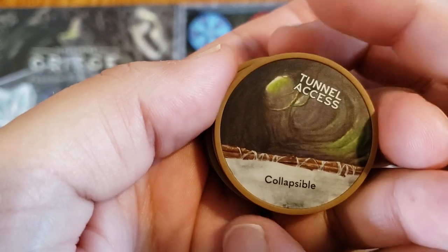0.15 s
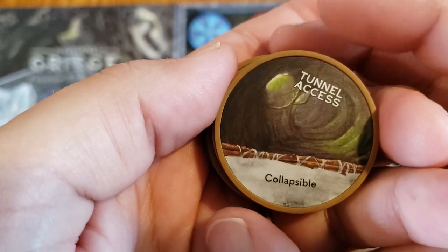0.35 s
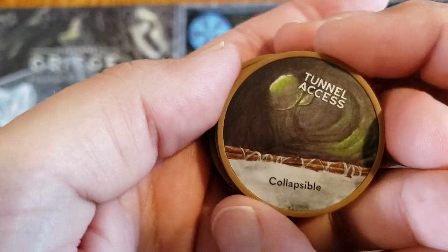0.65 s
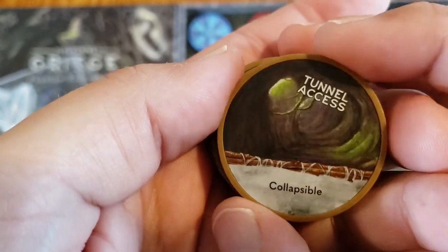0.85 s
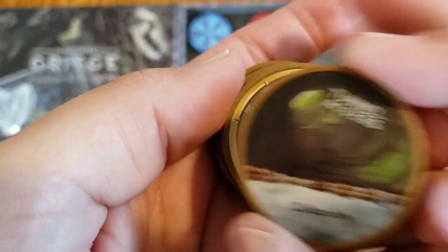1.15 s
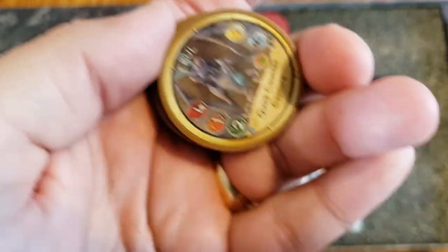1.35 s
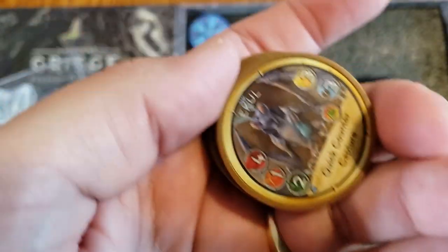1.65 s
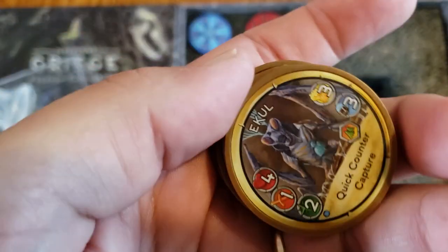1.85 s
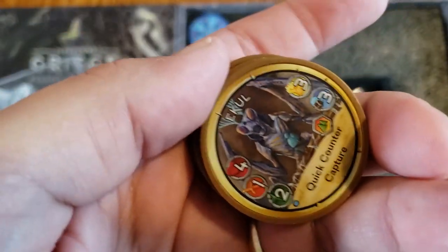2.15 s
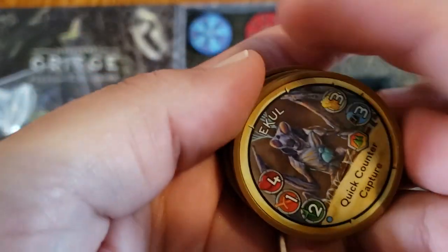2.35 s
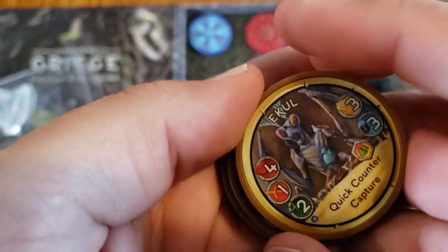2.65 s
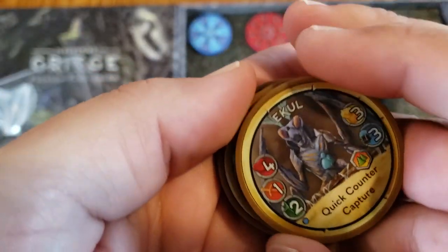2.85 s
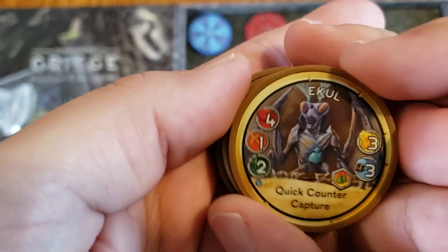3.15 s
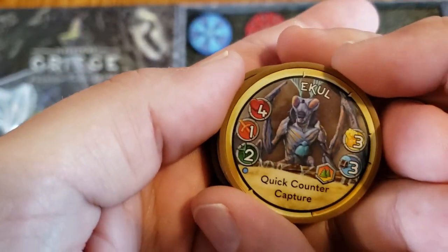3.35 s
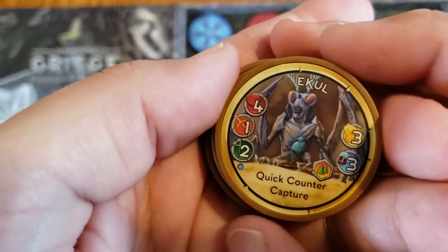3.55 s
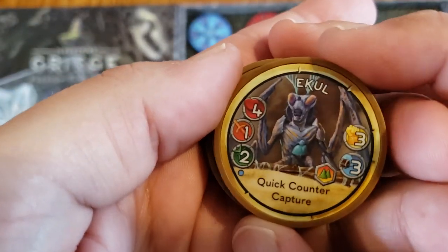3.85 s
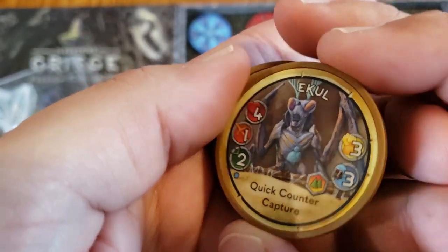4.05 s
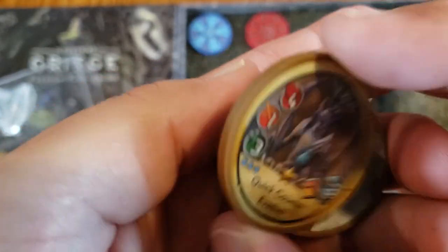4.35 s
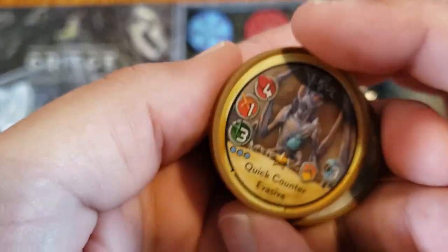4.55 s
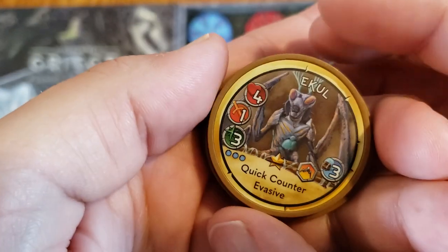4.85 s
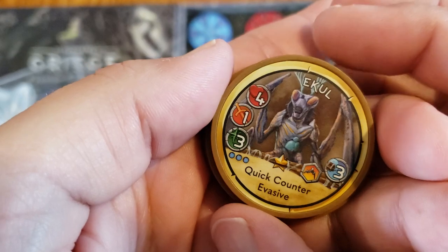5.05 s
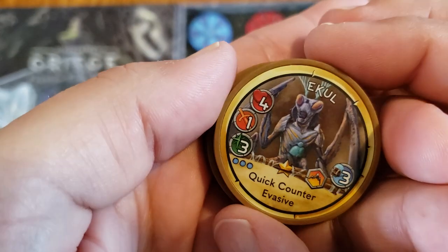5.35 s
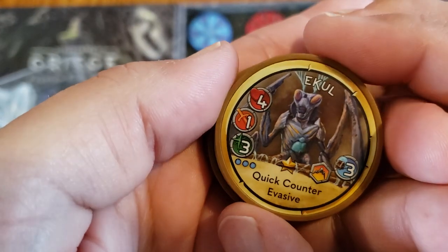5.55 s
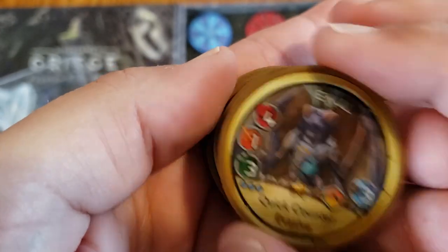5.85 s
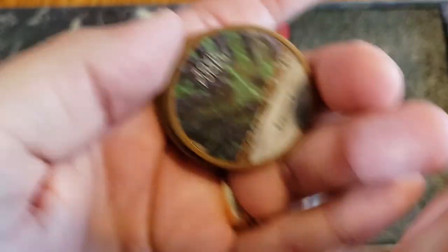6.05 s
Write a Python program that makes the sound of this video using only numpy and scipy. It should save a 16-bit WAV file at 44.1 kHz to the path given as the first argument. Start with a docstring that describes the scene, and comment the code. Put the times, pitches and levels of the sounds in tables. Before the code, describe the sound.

A quiet small room, with low wandering rumble, very faint hum and hiss, captured close by a phone in stereo. Nothing else until about 1.3 s, when dry skin brushes softly over a plastic rim. At 1.86 s a tossed chip skids and clatters on the table, the hardest hits near 1.91 s, woody thuds mixed with bright plastic clinks, bouncing rapidly until 2.14 s and fluttering away over half a second. From 2.4 to 3.1 s come faint skin rustle and small gritty slides of the stack, leaning left. Another brush at 3.35 s, a light click at 3.52 s with a soft rub, a tiny slip at 3.9 s. Faint scraping at 4.3-4.45 s, a crisp click at 4.6 s, then a loud, dense volley of sharp clacks at 4.80-4.84 s with a brief room tail. Quiet returns; one faint tick at 5.74 s.

```python
"""First a small quiet room is heard: wandering rumble, faint hum and hiss, from filtered noise and sines.
Close to the phone's microphone, skin brushes plastic game chips: swelling and fading treble noise.
One chip is tossed aside and clatters to rest on the table: decaying noise drives table and chip spectra.
The stack slides and clicks in the hand, and a flipped chip clacks home: gritty strokes through the stack's
spectrum and snaps through tuned resonances, nearer the left port and answered by the walls."""
import sys
import numpy as np
from scipy import signal
from scipy.fft import rfft, irfft, next_fast_len
from scipy.io import wavfile
from scipy.ndimage import map_coordinates

SR = 44100
rng = np.random.default_rng(int(sys.argv[2]) if len(sys.argv) > 2 else 0)


def master_out(mix):
    """Clip the mix to full scale and print it as 16-bit PCM to the path in sys.argv[1]."""
    frames = np.transpose(np.atleast_2d(mix))
    ceiling = np.clip(frames, -1, 1)
    pcm = np.round(ceiling * 32767).astype(np.int16)
    wavfile.write(sys.argv[1], SR, pcm)


N = 273420  # samples, 6.2 s


def amp(db):
    """Decibels to gain."""
    return 10 ** (np.asarray(db) / 20)


def unit(x):
    """Scaled to rms 1."""
    return x / np.sqrt(np.mean(x ** 2) + 1e-20)


def along(points, hz):
    """(f/Hz, value) points read on a log frequency axis."""
    f, v = np.transpose(points)
    return np.interp(np.log(hz + 1), np.log(f + 1), v)


def filtered(x, response):
    """x times a response of frequency."""
    n = x.shape[-1]
    padded = next_fast_len(n + 8192)
    spectrum = rfft(x, padded) * response(np.fft.rfftfreq(padded, 1 / SR))
    return irfft(spectrum, padded)[..., :n]


def body(x, spectrum, size=4096):
    """x through a causal (minimum-phase) body with this spectrum and unit energy."""
    cepstrum = irfft(np.log(amp(along(spectrum, np.fft.rfftfreq(size, 1 / SR)))))
    # folding the cepstrum forward in time makes the response causal
    cepstrum[1:size // 2] *= 2
    cepstrum[size // 2 + 1:] = 0
    kick = irfft(np.exp(rfft(cepstrum)))
    kick = kick / np.linalg.norm(kick)
    return signal.fftconvolve(x, kick[None], axes=1)[:, :x.shape[1]]


def ports(pair, alike):
    """Two unrelated signals mixed to a given left-right likeness at each frequency."""
    def turn(hz):
        return np.arccos(np.clip(along(alike, hz), -1, 1)) / 2
    mid, side = filtered(pair, lambda hz: np.array([np.cos(turn(hz)), np.sin(turn(hz))]))
    return np.array([mid + side, mid - side])


def pan(db):
    """Left and right gains, left louder by db, of mean power 1."""
    return unit(amp([[db / 2], [-db / 2]]))


def add(track, s, sound):
    """Mix a sound in at time s."""
    part = track[:, round(s * SR):][:, :sound.shape[1]]
    part += sound[:, :part.shape[1]]


def grit(n, rate, spread_db):
    """Stereo force of many tiny contacts whose size changes rate times a second."""
    knots = rng.standard_normal(n)
    size_db = spread_db * np.interp(np.arange(n) * rate / SR, np.arange(n), knots)
    return unit(rng.standard_normal((2, n)) * amp(size_db))


def band(x, hz, width):
    """x through the same resonance twice for steep sides, scaled to energy 1 per channel."""
    hz = np.clip(hz, 50, SR / 2.2)
    b, a = signal.iirpeak(hz, hz / abs(width), SR)
    y = signal.lfilter(b, a, signal.lfilter(b, a, x))
    return y / np.sqrt(np.sum(y ** 2) / len(y))


def ringing(force, modes):
    """A force sets a group of (f/Hz, width/Hz, level/dB) resonances ringing; energy 1 per channel in all."""
    y = sum(amp(db) * band(force, hz, width) for hz, width, db in modes)
    return y / np.sqrt(np.sum(y ** 2) / len(y))


def wobble(rate):
    """A smooth random curve, rate knots a second."""
    return map_coordinates(rng.standard_normal(256), [np.arange(N) * rate / SR], mode="wrap")


# spectrum of the room air: f/Hz, level per Hz/dB
AIR_SPECTRUM = [(15, -49.5), (25, -18.5), (81, 0), (125, -5), (191, -21.5), (224, -16.5), (250, -25.5),
                (309, -24.5), (462, -30), (515, -28.5), (790, -34), (6540, -42.5), (7280, -46.5),
                (13500, -34), (15000, -44)]
# how alike the air is at the two ports: f/Hz, left-right likeness (1 same, -1 opposite)
AIR_LIKENESS = [(60, 0.88), (180, 0.92), (550, 0.16), (1650, -0.069), (4970, -0.02), (15000, -0.52)]
# a low hum that swells once and fades: peak t/s, half length to 1/e/s, f/Hz, peak level/dB
SWELLING_HUM = (4.75, .65, 173, -74)
AIR_DB, RUMBLE_DB = -64, -66.5  # gains of the air's upper part and of its rumble
SWELL_DB, SWELLS_PER_S = 1.5, 5.3  # typical wander of the rumble, and its random knots a second


def background(hum_hz=222, hum_db=-78, hiss_db=-86):
    """Room rumble that wanders at random, air noise, a steady and a swelling hum, and microphone hiss."""
    t = np.arange(N) / SR
    air = unit(body(ports(rng.standard_normal((2, N)), AIR_LIKENESS), AIR_SPECTRUM))
    low = filtered(air, lambda hz: 1 / (1 + (hz / 170) ** 4))
    rumble = low * amp(RUMBLE_DB + SWELL_DB * wobble(SWELLS_PER_S))
    peak_s, half_s, low_hz, low_db = SWELLING_HUM
    swell = np.exp(-((t - peak_s) / half_s) ** 2)
    hums = amp(hum_db) * np.sin(2 * np.pi * hum_hz * t)
    hums += amp(low_db) * swell * np.sin(2 * np.pi * low_hz * t)
    # f/Hz, level per Hz/dB
    hiss_spectrum = [(6000, -23.5), (7400, 5.0), (8500, -24.5), (11500, -2.5), (14500, -12)]
    hiss = body(rng.standard_normal((2, N)), hiss_spectrum)
    # sqrt(2) makes the hum levels rms
    return amp(AIR_DB) * (air - low) + rumble + np.sqrt(2) * hums + amp(hiss_db) * hiss


# skin brushing a rim: t/s, rise/s, t60/s, level/dB, left over right/dB
RIM_BRUSHES = [(1.27, 0.013, 0.39, -58.5, -3), (2.425, 0.023, 0.49, -65, 0), (3.343, 0.014, 0.22, -56.5, 0),
               (3.57, 0.055, 0.38, -61.5, 5)]
# spectrum of dry skin on plastic: f/Hz, level per Hz/dB
SKIN_SPECTRUM = [(1500, -9.5), (5000, -18.5), (7200, -5), (8600, -10), (10000, -1), (12500, 3), (14500, 0),
                 (15500, 7)]


def brushes():
    """Dry skin hisses over a rim: many tiny contacts rise, then die away."""
    out, t = np.zeros((2, N)), np.arange(SR // 2) / SR
    for s, rise, t60, db, side_db in RIM_BRUSHES:
        stroke = np.minimum(t / rise, 1) * amp(db - 60 * np.maximum(t - rise, 0) / t60)
        add(out, s, stroke * grit(len(t), rate=710, spread_db=2.0) * pan(side_db))
    return body(out, SKIN_SPECTRUM)


# the tossed chip's bounces: t/s, table thud level/dB, chip clink level/dB, t60/s
CHIP_BOUNCES = [(1.863, -25.5, -24.5, .04), (1.886, -31, -28, .04), (1.9094, -20.5, -16, 0.03),
                (1.916, -18, -12, .028), (1.938, -25, -41, .03), (1.950, -28, -21.5, .05),
                (2.013, -36, -40, .025), (2.036, -29, -32, .04), (2.0674, -28.5, -24, 0.077),
                (2.087, -35.5, -26, .05), (2.115, -32.5, -43, .03), (2.136, -37, -33, .03)]
# spectrum of the table top: f/Hz, level per Hz/dB
TABLE_SPECTRUM = [(20, -48.5), (45, -21.5), (65, -8), (100, -11.5), (135, 3), (190, -5), (310, 0.5),
                  (520, -3.5), (720, 0), (980, -7), (1230, -2.5), (1500, -6.5), (2300, -6), (3200, -13),
                  (3900, -16.5), (7000, -30)]
# spectrum of a free chip: f/Hz, level per Hz/dB
CHIP_SPECTRUM = [(1500, -33), (3700, -18.5), (4800, -11.5), (5600, -10), (6500, -7.5), (7080, 2.5),
                 (7700, -13), (8750, -28.5), (9700, -9.5), (10600, -20.5), (11800, -14.5), (13300, -26.5),
                 (14500, -25), (15500, -40.5)]
# the chip rocks from its first bounce until it lies flat, then table and chip die away
SETTLE_S, TABLE_SETTLE_T60_S, CHIP_SETTLE_T60_S = 2.1354, 0.3, 0.59
DRUM_DB, DRUM_SAG_DB_PER_S = -28, 17.5  # its rim drumming on the table
JIGGLE_DB, JIGGLE_T60_S = -15, .5  # the jiggle each bounce leaves in the chip, against that bounce's clink


def toss(skid_end=1.908, skid_top_hz=8000):
    """The tossed chip skids in, bounces and rocks to rest, driving the table top and its own ring."""
    t = np.arange(N) / SR
    landing = CHIP_BOUNCES[0][0]
    resting = np.maximum(t - SETTLE_S, 0)
    drum = (t >= landing) * amp(DRUM_DB - DRUM_SAG_DB_PER_S * (t - landing))
    jiggles = [(t >= s) * amp(db + JIGGLE_DB - 60 * np.abs(t - s) / JIGGLE_T60_S)
               for s, _, db, _ in CHIP_BOUNCES]
    jiggle = np.linalg.norm(jiggles, axis=0)  # powers add
    thud = amp(-60 * resting / TABLE_SETTLE_T60_S) * drum * grit(N, rate=160, spread_db=3)
    clink = amp(-60 * resting / CHIP_SETTLE_T60_S) * jiggle * grit(N, rate=450, spread_db=1.5)
    age = t[:SR // 5]
    for s, thud_db, clink_db, t60 in CHIP_BOUNCES:
        add(thud, s, amp(thud_db - 60 * age / t60) * rng.standard_normal((2, len(age))))
        add(clink, s, amp(clink_db - 60 * age / t60) * rng.standard_normal((2, len(age))))
    # f/Hz, left-right likeness
    table_likeness = [(130, 1.0), (290, .88), (640, .4), (1400, 0.05), (3000, 0.054)]
    table = body(ports(thud, table_likeness), TABLE_SPECTRUM)
    clatter = table * pan(1.5) + body(clink, CHIP_SPECTRUM) * pan(-3.5)
    # the glancing first contacts are duller than the hard hits on other chips
    dull = filtered(clatter, lambda hz: 1 / np.sqrt(1 + (hz / skid_top_hz) ** 6))
    return np.where(t < skid_end, dull, clatter)


# what rings on in the table: f/Hz, width of each filter pass/Hz, level before rise and rocking/dB, t60/s
TABLE_MODES = [(312, 55, -35, 0.81), (365, 45, -47, 0.75), (1180, 330, -44, 0.71), (2100, 950, -48.5, 0.28)]


def table_ring(start=2.01, rise=0.036, rock_rate=16, rock_db=3.5):
    """The settling chip rocks to and fro and keeps a few table resonances fluttering."""
    age = np.maximum(np.arange(N) / SR - start, 0)
    shake = ports(rng.standard_normal((2, N)), [(300, 0.88), (1300, 0.26)])
    rings = sum(amp(db - 60 * age / t60) * unit(band(shake, hz, width))
                for hz, width, db, t60 in TABLE_MODES)
    rocking = amp(rock_db * np.cos(2 * np.pi * rock_rate * age))
    return rings * (1 - np.exp(-age / rise)) * rocking


# faces sliding in the stack: t/s (begun 3 ms sooner), length/s, level/dB (then 2.5 dB lower),
# knock tilt at 2500 Hz and below/dB, ring tilt at 5000 Hz/dB
STACK_SLIDES = [(2.564, 0.016, -56, 9.5, -6), (2.575, .03, -52.5, 3, 2), (2.618, 0.053, -66, -8, 3),
                (2.693, .04, -72.5, -14, -7), (2.747, 0.0031, -62.5, -18, -14),
                (2.843, 0.032, -60.5, -2, 4.5), (3.057, 0.047, -66, -8, 0), (3.122, 0.062, -63, -6.5, 2.5),
                (3.545, 0.098, -73.5, -3, -1), (3.885, .008, -69, -3.5, 4.5),
                (4.379, 0.067, -63.5, -2, -13), (4.417, 0.013, -59, 13, -4), (4.567, 0.0078, -68, 7, -9),
                (4.76, .006, -69, -10.5, -14)]
# spectrum of the rubbed stack: f/Hz, level per Hz/dB
STACK_SPECTRUM = [(300, -34), (850, -1), (1350, -13), (2100, 0.5), (3300, -16.5), (4300, -7.5), (5000, 5),
                  (5900, -20), (7100, -1.5), (8600, -27), (9700, -13.5), (11000, -22.5), (15000, -24.5)]


def slides(release=0.015, edge=0.67):
    """Chip faces catch and slip on each other in short gritty strokes."""
    out = np.zeros((2, N))
    for s, length, db, knock_db, ring_db in STACK_SLIDES:
        n = int(length * SR)
        pressure = np.pad(signal.windows.tukey(n, edge), (0, SR // 25))
        keep = np.exp(-1 / (min(release, length / 4) * SR))
        pressure = signal.lfilter([1 - keep], [1, -keep], pressure)  # the finger eases off
        force = grit(len(pressure), rate=150, spread_db=1.5) * pressure
        tilt = [(2500, knock_db), (4200, 0), (5000, ring_db), (5900, 0)]
        stack = [(hz, level + along(tilt, hz)) for hz, level in STACK_SPECTRUM]
        add(out, s - .003, amp(db - 2.5) * body(force, stack))
    return out * pan(10.4)


# chip on chip in the hand: t/s, level over 5 ms/dB, then mix gains of knock/dB, clink/dB, edge/dB, palm/dB
# (the ring's is ring_db); left over right/dB, knock f/Hz, ring f/Hz, palm f/Hz
HAND_CLICKS = [(3.5208, -44.5, 4, -7, -20.5, -5.5, 7.3, 1850, 4980, 1080),
               (4.3172, -64.5, 11.5, 1.5, -5, 2, 3.6, 1700, 4900, 950),
               (4.6042, -34.5, -11.5, -6, -10, -21.5, 4.9, 2600, 4800, 1000),
               (4.802, -33.5, -19.5, 1, -16, -33.5, 11.6, 2900, 5400, 760),
               (4.805, -32.5, -10.5, 3.5, -17.5, -27, 7.6, 2900, 5300, 760),
               (4.8184, -26, -12.5, 2, -9.5, -28, 9.1, 2900, 5450, 760),
               (4.8294, -17.5, -13.5, 8, -9, -31.5, 20, 3400, 5100, 760),
               (4.8318, -21, -11, 9.5, -10.5, -27.5, 4.9, 2400, 5200, 760),
               (4.8384, -16, -16.5, -6.5, -16, -35.5, 10.2, 3500, 5100, 760),
               (4.8428, -28, -18.5, -4, -14.5, -31, 8.5, 3000, 4750, 760),
               (5.738, -46, 0, -8.5, -6.5, -14.5, 3, 3500, 4950, 950)]
# the chip's clink: f/Hz, width of each filter pass/Hz, level/dB
CLINK_MODES = [(6875, 170, -3), (6864, 360, -4.5)]
# the chip's bright edge: f/Hz, width of each filter pass/Hz, level/dB
EDGE_MODES = [(9870, 690, -2), (11450, 1400, -2), (12160, 1100, -7.5), (14500, 410, -11.5)]
PALM_Q = 3.2  # the cupped palm is a broad resonance


def clicks(chatter_db=-4, knock_width=1800, ring_width=750, ring_db=-1, shoulder=1.12, shoulder_db=-7):
    """Each contact is a snap with a brief chatter; the grip sets the pitch of knock, ring and palm."""
    out, t = np.zeros((2, N)), np.arange(SR // 12) / SR
    chatter_t60, lag, duration = .016, .0001, .005  # s
    for s, db, knock_db, clink_db, edge_db, palm_db, side_db, knock_hz, ring_hz, palm_hz in HAND_CLICKS:
        chatter = rng.standard_normal((2, len(t))) * amp(-60 * t / chatter_t60)
        force = amp(chatter_db) * chatter / np.linalg.norm(chatter[0])
        force[[0, 1], [0, round(lag * SR)]] += 1  # the right port hears the snap later
        knock = ringing(force, [(knock_hz, knock_width, 0)])
        palm = ringing(force, [(palm_hz, palm_hz / PALM_Q, 0)])
        ring = ringing(force, [(ring_hz, ring_width, 0), (ring_hz * shoulder, ring_width, shoulder_db)])
        blow = amp(ring_db) * ring + amp(knock_db) * knock + amp(palm_db) * palm
        blow += amp(clink_db) * ringing(force, CLINK_MODES)
        blow += amp(edge_db) * ringing(force, EDGE_MODES)
        blow = blow / np.linalg.norm(blow, axis=1, keepdims=True)
        blow = blow * np.sqrt(duration * SR)  # rms 1 over its duration
        add(out, s, amp(db) * blow * pan(side_db))
    return out


# how fast the walls' answer dies: f/Hz, t60/s
ROOM_DECAY = [(150, 0.26), (800, 0.22), (2500, 0.2), (5000, 0.25), (7000, 0.27), (14000, 0.21)]


def room(x, build=0.002):
    """The walls' diffuse answer builds up in a few ms; each frequency dies at its own speed."""
    hz, t, z = signal.stft(rng.standard_normal((2, SR // 2)), SR, nperseg=256)
    decay = amp(-60 * t / along(ROOM_DECAY, hz)[:, None])
    tail = signal.istft(z * decay, SR, nperseg=256)[1]
    tail = tail * (1 - np.exp(-(np.arange(tail.shape[1]) / SR / build) ** 2))
    return signal.fftconvolve(x[None], tail / np.linalg.norm(tail[0]), axes=1)[:, :N]


# how well each frequency leaves the hand for the walls: f/Hz, level/dB
HAND_RADIATION = [(400, 3.5), (750, 6), (1500, 1), (2700, 6), (3700, 8), (5000, -1.5), (6000, 1.5),
                  (6900, -3), (7700, 6), (8700, -6), (9700, 9.5), (14000, 3.5)]


def scene(room_db=-11):
    """Chips in the hand and on the table, in the room."""
    hand = clicks() + slides()
    # the left port is so near the hand that it hears far more than reaches the walls: the right feeds them
    radiated = filtered(hand[1], lambda hz: amp(along(HAND_RADIATION, hz)))
    walls = amp(room_db) * room(radiated)
    return hand + walls + toss() + table_ring() + brushes() + background()


TOP_HZ = 14900  # the phone's band limit


def record(dry):
    """The phone's very steep low-pass keeps almost nothing above its band limit."""
    return filtered(dry, lambda hz: 1 / (1 + (hz / TOP_HZ) ** 120))


dry = scene()
out = record(dry)
master_out(out)
```